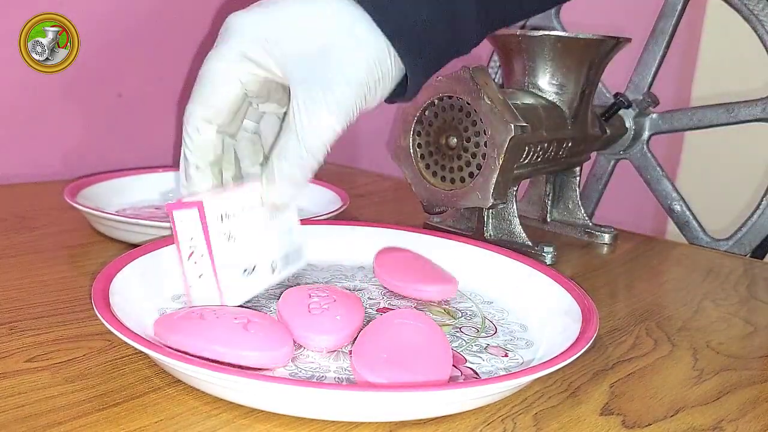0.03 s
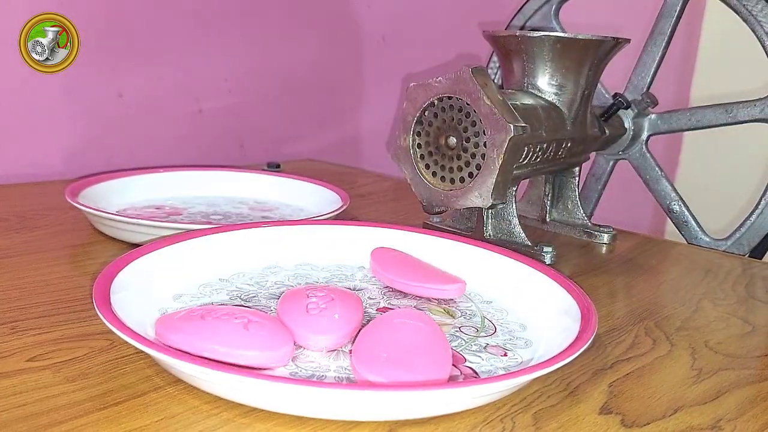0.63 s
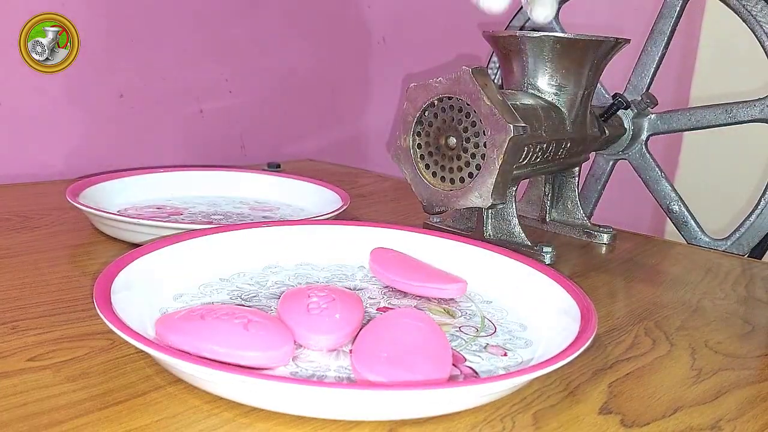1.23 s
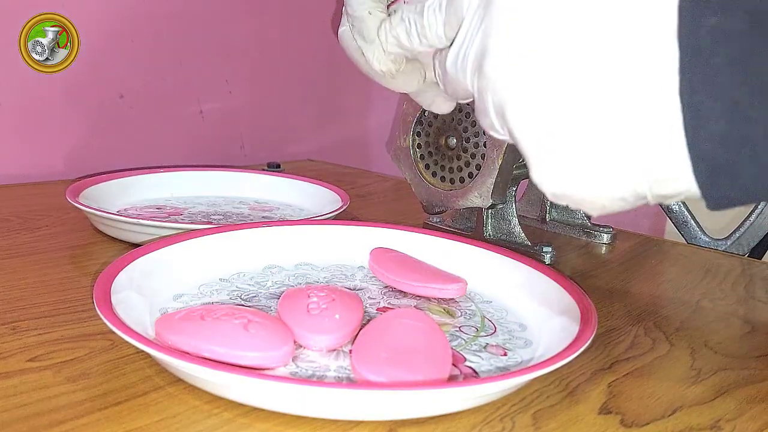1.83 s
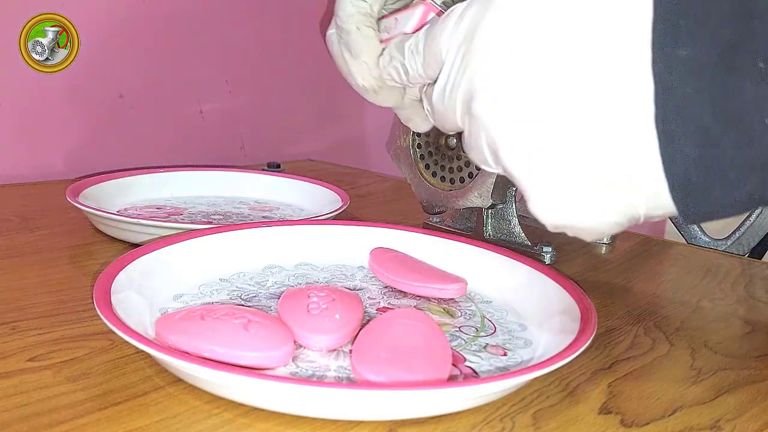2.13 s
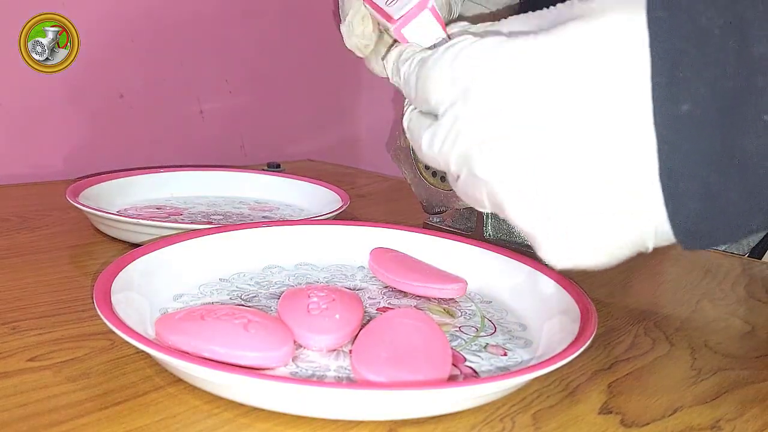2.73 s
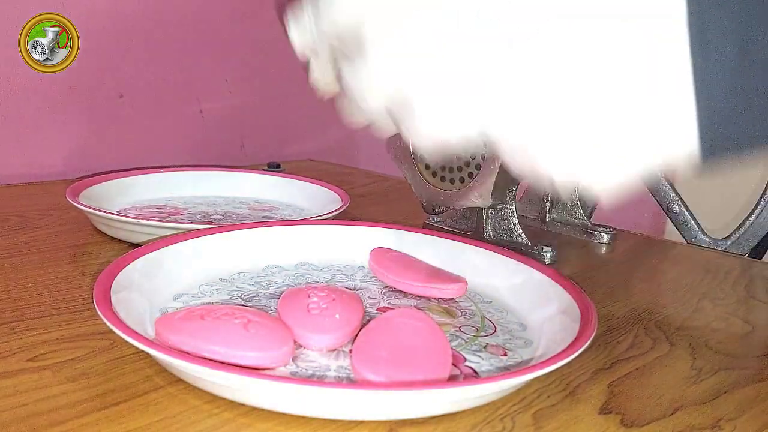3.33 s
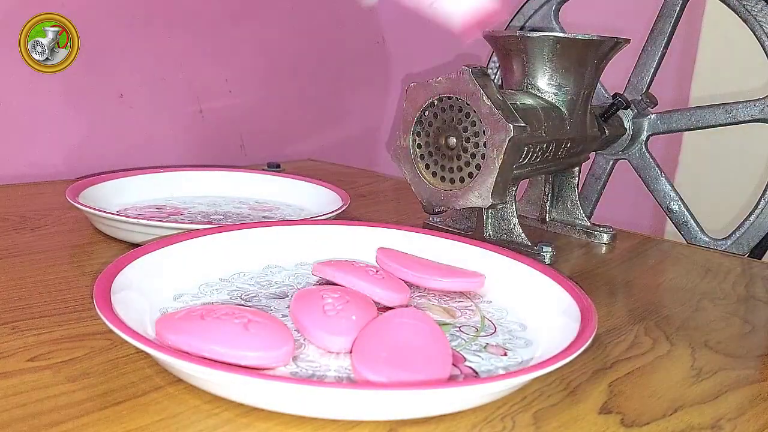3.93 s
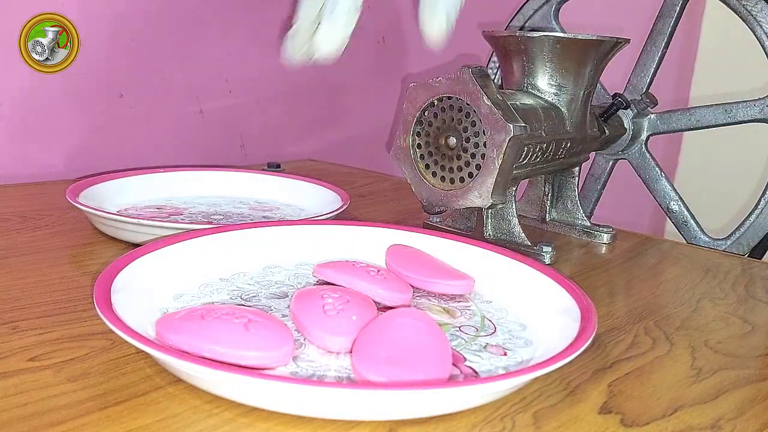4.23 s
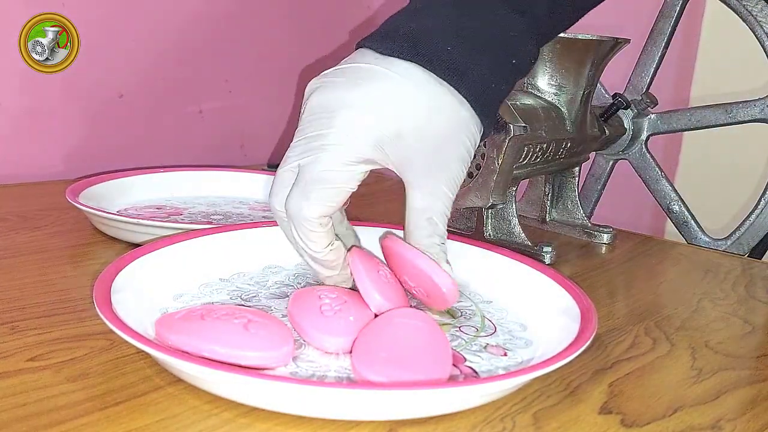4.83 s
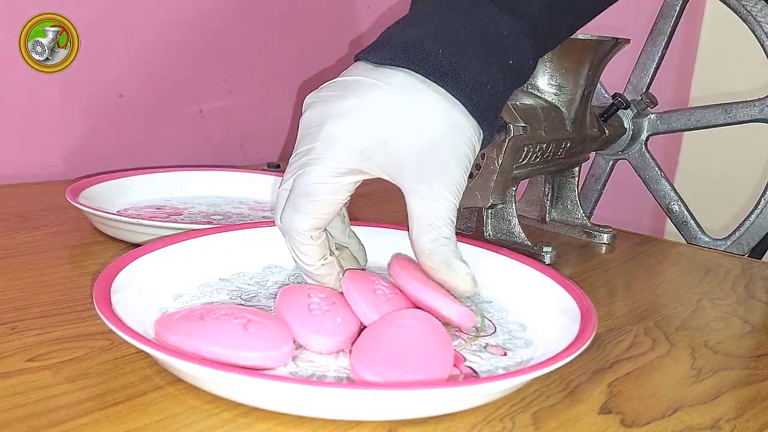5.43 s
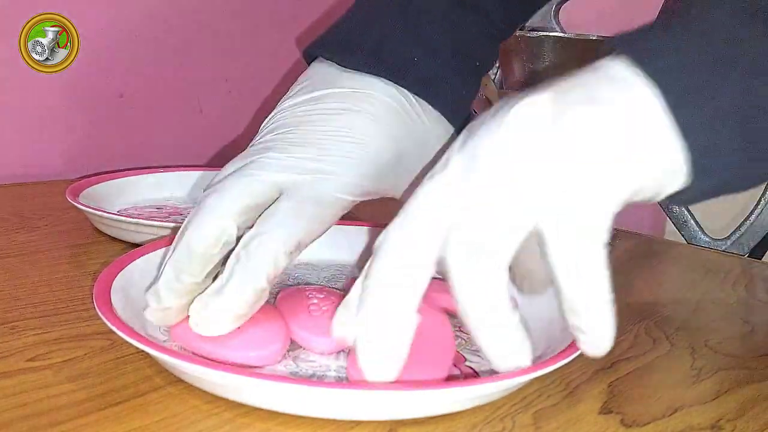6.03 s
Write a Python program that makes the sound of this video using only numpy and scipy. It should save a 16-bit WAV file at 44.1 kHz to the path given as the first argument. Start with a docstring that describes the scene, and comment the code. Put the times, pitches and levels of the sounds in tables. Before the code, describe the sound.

A card box is opened with small snaps, then a soap bar drops and clatters among others on a plate in a quiet room.

```python
"""Soap knocks softly on a plate and a bar rocks to rest as gloved hands lift a carton away.
Close by, just left of a pair of microphones, the card pops, the flap scrapes open and a bar slides out.
It clatters among the other bars on the plate, which rings and thumps the wooden table.
Fingers then nudge the bars, which knock and rock again; a small bare room answers it all."""
import sys
import numpy as np
from scipy import signal
from scipy.fft import rfft, irfft, next_fast_len
from scipy.io import wavfile
from scipy.ndimage import uniform_filter1d

SR = 44100
rng = np.random.default_rng(int(sys.argv[2]) if len(sys.argv) > 2 else 0)


def inscribe(sig):
    """Save sig as 16-bit PCM at rate SR to the path in sys.argv[1].

    A 1-D sig is mono; a 2-D sig holds one channel per row.
    Samples are clipped to [-1, 1] before scaling.
    """
    pcm = np.round(np.clip(np.atleast_2d(sig).T, -1, 1) * 32767)
    wavfile.write(sys.argv[1], SR, pcm.astype(np.int16))


N = 268569
T = np.arange(N) / SR
SHORT = 4096  # samples in one short blow


# Soap striking soap and plate, close to the microphones; the first few, up to 0.2 s, are the carton tapping #
# against the soap and plate. Each row: start in seconds, level in dB, # brightness in Hz, chatter in seconds,
# then the hollow note's pitch in Hz, t60 in seconds and share in dB.
SOAP_KNOCKS = [(0.043, -41, 1800, 0.016, 434, 0.05, 15), (0.048, -41.5, 1770, 0.0012, 1615, 0.02, 8.5),
               (0.061, -46.5, 2240, 0.0011, 1770, 0.016, 3), (0.087, -39, 1690, 0.0009, 1400, 0.009, 0),
               (0.140, -45.5, 955, 0.0038, 834, 0.058, 3), (0.176, -48.5, 1290, 0.01, 424, 0.024, 10.5),
               (0.255, -59, 1300, 0.0076, 935, 0.04, 3), (0.307, -55, 1300, 0.0066, 880, .03, 10),
               (0.367, -59, 1460, 0.0035, 1530, 0.019, 5), (0.498, -64.5, 1390, .006, 900, .02, 3),
               (0.609, -60, 1130, 0.0073, 870, 0.028, 2), (3.673, -16, 4500, 0.00074, 2232, 0.005, -0.5),
               (3.6753, -20, 8950, 0.0007, 1980, .012, -1.5), (3.689, -22.5, 890, 0.0045, 910, 0.017, 6.5),
               (3.703, -22, 1100, 0.0058, 664, 0.018, 7), (3.717, -25.5, 1010, 0.011, 520, .025, -0.5),
               (3.7304, -21, 9500, 0.0032, 990, 0.0077, -8), (3.7358, -18.5, 6250, 0.002, 4110, .008, -6.5),
               (3.742, -25.5, 1710, 0.013, 540, 0.015, -11), (3.753, -29.5, 1700, 0.0063, 1333, .015, -23),
               (3.764, -19.5, 3000, .005, 2288, 0.01, -7), (3.773, -21, 3930, 0.0048, 1930, 0.026, -6),
               (3.792, -33.5, 1295, 0.0062, 300, 0.079, -10), (3.813, -20, 2460, 0.017, 2030, 0.01, -18),
               (3.839, -27.5, 897, 0.0032, 535, .025, 5), (3.853, -28.5, 1400, .006, 681, 0.018, -11),
               (3.868, -23.5, 5020, 0.0058, 376.5, 0.013, 5),
               (3.8727, -20, 7840, 0.0026, 2993, 0.0097, -6.5), (3.881, -26.5, 5390, 0.0042, 1940, .015, 6),
               (3.899, -28, 1314, 0.0042, 479, 0.025, 1.5), (3.917, -36, 1800, .005, 326, 0.033, -3),
               (4.402, -50, 890, 0.0059, 500, 0.048, 0.5), (4.692, -48, 1115, 0.00036, 874, 0.048, 2),
               (4.725, -39.5, 2700, 0.0086, 904, 0.019, -7), (4.751, -48, 1300, 0.012, 1213, 0.032, 14),
               (4.809, -44.5, 1434, 0.004, 1593, 0.025, 2), (4.992, -60, 908, 0.011, 614, 0.033, -9),
               (5.073, -65.5, 1413, 0.0048, 1242, 0.016, 0), (5.136, -54.5, 1010, 0.009, 840, 0.048, 0),
               (5.267, -47.5, 3590, 0.0059, 857, 0.016, 2), (5.274, -46, 2770, 0.0041, 1318, 0.012, -2),
               (5.297, -46, 620, 0.0098, 610, .03, 7), (5.578, -54.5, 926, 0.0035, 844, 0.037, -5.5),
               (5.614, -57.5, 1500, 0.0052, 1300, .015, 4), (5.646, -44.5, 6570, 0.0027, 1400, 0.014, 9.5),
               (5.696, -47.5, 880, 0.004, 398, 0.037, 4), (5.7202, -41, 1900, 0.0013, 940, 0.015, 3.5),
               (6.076, -46, 1640, 0.011, 1330, 0.022, -9)]
# The broad crack of a waxy contact. Each row: frequency in Hz, level in dB.
WAX_CRACK = [(60, -16), (300, 20), (700, 5), (1200, -11), (2200, -4), (3500, -1), (5000, -2), (7500, -9.5),
             (11000, -12.5), (15000, -11.5)]
# A bar's short clack. Each row: pitch in Hz, level in dB, t60 in seconds.
BAR_MODES = [(560, -10.5, 0.0054), (956.6, -7.5, 0.007), (1354, 4, 0.0043), (1960, -1, 0.005),
             (2360, 4, 0.0013), (3056, -12, 0.008)]
# The ring of the loaded plate. Each row: pitch in Hz, level in dB, t60 in seconds.
PLATE_MODES = [(157, -3.5, .6), (255, -4, .2), (300, -1, .4), (364, -3, .35), (416, -6, .35),
               (495, -5, .38), (538, -4, .35), (571, -5, .36), (606, -6, .3), (652, -4, .3), (681, -4, .3),
               (830, -2, .2), (892, 0, .25), (1020, -2, .14), (1152, -2, .16), (1314, -2, .16),
               (1450, -3, .12), (1615, 0, .18), (1770, -2, .12), (1905, 0, .17), (1949, -1, .16),
               (2078, -1, .15), (2145, -1, .16), (2260, -2, .13), (2331, -3, .14), (2560, -5, .07),
               (2750, -6, .06), (3110, -9, .05)]


def soap(thin_share=0.61, spread_s=0.0035, plate_db=-6, plate_reach_hz=2700, spot_count=4):
    """Each knock cracks, clacks and rings the plate; one track for each spot on the plate."""
    spots = np.zeros((spot_count, N))
    click = crack(WAX_CRACK)
    bar = modes(BAR_MODES, SHORT)
    plate_hz = np.array(PLATE_MODES)[:, 0]
    spread = 1 - np.exp(-T[:SR // 2] / spread_s)  # bending waves need a moment to fill the plate
    for k, (s, db, bright_hz, chatter_s, note_hz, note_t60, note_db) in enumerate(SOAP_KNOCKS):
        spot = spots[k % spot_count]
        # hard blows land on a small edge, which radiates little bass
        edge = signal.butter(1, min(thin_share * bright_hz, SR / 4), "high", fs=SR)
        force = contact(bright_hz, chatter_s)
        clack = struck(signal.lfilter(*edge, force), click + ring(bar))
        add(spot, s, db, unit(clack + amp(note_db) * hollow(force, note_hz, note_t60)))
        reach_hz = min(bright_hz, plate_reach_hz)  # soft wax drives only the plate's lower modes
        drive = rng.choice([-1, 1], len(plate_hz)) / np.sqrt(1 + (plate_hz / reach_hz) ** 4)
        plate = ring(modes(PLATE_MODES, SR // 2, detune=0.013), drive)  # shifting bars change the load
        add(spot, s, db + plate_db, spread * plate)
    return spots


# The bar's full weight coming down. Each row: start in seconds, level in dB.
BAR_LANDINGS = [(3.677, -27), (3.734, -25), (3.875, -35)]
# The wooden table under the plate. Each row: pitch in Hz, level in dB, t60 in seconds.
TABLE_MODES = [(72.96, 2, 0.84), (104, 4.5, 0.15), (158.8, -15.5, 1), (240, -4.5, 0.035)]


def table_thumps(build_s=0.02):
    """The falling bar bends the table top, which carries the thud straight to the microphones."""
    out = np.zeros(N)
    build = 1 - np.exp(-T[:SR] / build_s)
    thud = unit(modes(TABLE_MODES, SR).sum(axis=0) * build)
    for s, db in BAR_LANDINGS:
        add(out, s, db, thud)
    return out


# Card snapping in the hands. Each row: start in seconds, level in dB, brightness in Hz,
# chatter in seconds, then the hollow note's pitch in Hz, t60 in seconds and share in dB.
CARD_SNAPS = [(0.049, -47, 10800, 0.0014, 4480, 0.0071, -15), (0.062, -54, 7000, 0.0024, 3270, .004, -6),
              (0.083, -57, 7500, .004, 4840, 0.0034, -6), (0.14, -55, 6000, 0.0028, 4480, .008, -9),
              (0.176, -55, 11500, 0.001, 3740, .008, -35), (1.405, -59.5, 2000, 0.0095, 880, .02, -5),
              (1.43, -59.5, 3000, 0.0067, 1500, 0.0062, -14), (1.629, -58, 9000, 0.002, 1120, 0.0092, 4),
              (1.6665, -47, 18300, 0.00063, 490, 0.018, 7), (1.682, -45, 3500, 0.0037, 1610, 0.005, 3),
              (1.70, -49.5, 1200, 0.0054, 435, .03, 9), (2.1744, -46.5, 19300, 0.0021, 880, 0.027, 1),
              (2.244, -56, 11900, 0.0035, 3330, .004, 1), (2.2495, -40.5, 18900, 0.0014, 7700, 0.0045, -19),
              (2.2483, -39.5, 7400, 0.0012, 1210, 0.012, -3), (2.2512, -39, 4530, 0.0018, 2460, 0.0029, 8),
              (2.2555, -42, 18800, 0.0027, 2970, 0.0042, -0.5),
              (2.934, -47, 14200, 0.015, 2420, 0.0057, -3.5),
              (3.0061, -38.5, 9000, 0.00063, 1100, 0.013, 5),
              (3.019, -41.5, 17000, 0.0054, 1050, 0.0091, -1.5),
              (3.0454, -42, 3186, 0.0022, 2380, 0.0084, 12),
              (3.054, -45.5, 3300, 0.0064, 1480, 0.028, -1.5), (3.172, -60, 11200, .005, 7060, .004, -11.5),
              (3.203, -54, 2372, 0.007, 1080, 0.0082, -1.5), (3.563, -58, 1325, 0.0026, 990, 0.024, -2),
              (3.597, -46, 1276, 0.0036, 1098, 0.022, 2), (4.160, -55.5, 11150, 0.0085, 4160, .004, -2)]
# The broad crack of creased card. Each row: frequency in Hz, level in dB.
CREASE_CRACK = [(100, -23.5), (400, 4.5), (1000, 10), (2500, 2.5), (4000, -4.5), (7000, -4.5),
                (15000, -12.5)]
# The hollow carton. Each row: pitch in Hz, level in dB, t60 in seconds.
CARTON_MODES = [(820, -7.5, 0.045), (1061, -2.5, 0.027), (1470, 0.5, 0.0074), (2044, -3, .009),
                (2900, -8.5, .005)]


def carton_snaps(carton_db=-2, thin_hz=1000, thin_at_bright_hz=8200):
    """Folds and tabs let go with a crack and a hollow pop; bright snaps from small edges are thin."""
    out = np.zeros(N)
    click = crack(CREASE_CRACK)
    for s, db, bright_hz, chatter_s, note_hz, note_t60, note_db in CARD_SNAPS:
        low_cut_hz = min(thin_hz * (bright_hz / thin_at_bright_hz) ** 2, SR / 4)
        edge = signal.butter(1, low_cut_hz, "high", fs=SR)
        force = contact(bright_hz, chatter_s)
        carton = modes(CARTON_MODES, SHORT, detune=0.081)  # the grip changes the carton's hollow
        snap = struck(signal.lfilter(*edge, force), click + amp(carton_db) * ring(carton))
        add(out, s, db, unit(snap + amp(note_db) * hollow(force, note_hz, note_t60)))
    return out


# Soap rasping inside the carton. Each row: frequency in Hz, level in dB.
SLIDE_SPECTRUM = [(150, -12.5), (550, -4), (750, -4), (1000, 1), (1400, -0.5), (1800, -6), (2600, -20.5),
                  (4000, -21), (6000, -19.5), (14000, -26.5)]


def bar_slide(start_s=3.555, exit_s=3.672, db=-38.5, release_s=0.0055):
    """The tipped bar speeds up evenly, and its rasp grows until it leaves the carton."""
    speed = np.clip((T - start_s) / (exit_s - start_s), 0, 1)
    inside = np.exp(-np.clip((T - exit_s) / release_s, 0, 20))
    return amp(db) * speed * inside * friction(SLIDE_SPECTRUM)


# Pulls on the flap. Each row: start in seconds, length in seconds, level in dB.
FLAP_PULLS = [(2.172, 0.058, -57), (2.898, 0.12, -52), (2.916, 0.019, -53), (2.998, 0.054, -45)]
# Card dragging on card. Each row: frequency in Hz, level in dB.
FLAP_SPECTRUM = [(180, -36), (300, -11), (404, -36), (453, -30), (600, -10), (652, -5.5), (1020, 3),
                 (1540, -0.5), (4420, -6.5), (5210, -12), (10300, -14.5), (15500, -15)]


def carton_flap(fibres_db=-3, catch_db=3.5, catches_per_s=130):
    """The flap drags out of its slot in small jerks while the card's fibres crackle."""
    scrape = friction(FLAP_SPECTRUM, grain_db=-0.5) + amp(fibres_db) * crackle()
    jerks = amp(catch_db * wander(catches_per_s))
    return strokes(FLAP_PULLS, attack_s=0.017, release_s=0.014) * jerks * scrape


# A rounded bar rocking on the plate. Each row: first swing in seconds, end of the swings in seconds,
# time between swings in seconds, level in dB.
ROCKING_SPELLS = [(0.078, .93, 0.1121, -47.5), (5.662, 6.0, 0.066, -51)]
# Its rolling rumble. Each row: frequency in Hz, level in dB.
RUMBLE_SPECTRUM = [(100, -10), (157, 3.5), (210, -11.5), (330, -8), (440, 9.5), (560, -14), (700, -35),
                   (1700, -26), (4000, -52)]
# Its rattle. Each row: frequency in Hz, level in dB.
RATTLE_SPECTRUM = [(500, 11.5), (850, -1.5), (1150, -9), (1600, -12), (2200, -11), (4000, -30), (8000, -23)]
ROCK_HZ, ROCK_BEND_HZ, ROCK_WIDTH_HZ = 366.6, 99, 59
ROCK_NOTE_DB, RUMBLE_DB, RATTLE_DB = 3, -1, -8


def rocking_bar(swing_s=0.017, uneven_s=0.0075, uneven_db=1.2, fade_db_per_s=13.5):
    """The bar rumbles and rattles in uneven, dying swings; its rough contact note rises in mid-swing."""
    swing, gain = np.zeros(N), np.zeros(N)
    for first_s, rest_s, period_s, db in ROCKING_SPELLS:
        for s, (late, strong) in zip(np.arange(first_s, rest_s, period_s), rng.standard_normal((16, 2))):
            from_middle = abs(T - s - uneven_s * late) / swing_s
            speed = np.exp(-.5 * np.minimum(from_middle, 10) ** 2)
            swing = np.maximum(swing, speed)
            gain += amp(db - fade_db_per_s * (s - first_s) + uneven_db * strong) * speed
    phase = 2 * np.pi * np.cumsum(ROCK_HZ + ROCK_BEND_HZ * swing) / SR
    note = (wander(ROCK_WIDTH_HZ) * np.sin(phase) + wander(ROCK_WIDTH_HZ) * np.cos(phase)) / np.sqrt(2)
    rattle = swing * friction(RATTLE_SPECTRUM, grain_db=6.5)
    rumble = friction(RUMBLE_SPECTRUM)
    return gain * (amp(ROCK_NOTE_DB) * note + amp(RUMBLE_DB) * rumble + amp(RATTLE_DB) * rattle)


# Fingers pushing a bar. Each row: start in seconds, length in seconds, level in dB.
SCUFF_PUSHES = [(-0.03, 0.037, -41.5), (.26, 0.34, -66.5), (1.39, 0.015, -68), (4.395, 0.023, -55),
                (4.71, 0.12, -49), (4.98, 0.094, -62.5), (5.1, 0.23, -66.5), (5.612, 0.12, -52)]
# Soap dragging on the plate. Each row: frequency in Hz, level in dB.
SCUFF_SPECTRUM = [(150, 5.5), (350, 4.5), (600, 8.5), (850, -1), (1400, -3.5), (2100, -10.5), (3000, -27),
                  (6000, -23), (12000, -35)]


def bar_scuffs():
    """A pushed bar scuffs over the plate in tiny slips."""
    return strokes(SCUFF_PUSHES, attack_s=0.0055, release_s=0.022) * friction(SCUFF_SPECTRUM, grain_db=3)


# Glove strokes. Each row: start in seconds, length in seconds, level in dB, extra treble in dB.
GLOVE_STROKES = [(-0.03, 0.13, -66, 0), (0.268, 0.32, -74.5, -11), (0.85, .12, -69.5, -8),
                 (1.005, 0.31, -75, 2), (1.3, 0.16, -72.5, -8), (1.694, 0.2, -70, -2),
                 (1.993, 0.031, -65, -10), (2.31, 0.15, -66, -2.5), (2.504, 0.085, -69.5, -13),
                 (2.728, 0.07, -85, 17), (3.11, 0.19, -66.5, -1), (3.353, 0.07, -70.5, 9),
                 (3.483, 0.054, -75.5, 4), (3.571, 0.61, -67.5, 2.5), (4.417, 0.057, -70.5, -0.5),
                 (4.605, 0.11, -68, 2), (4.731, 0.14, -72.5, -9), (5.0, 0.28, -78.5, 1.5),
                 (5.731, 0.18, -76.5, 8), (5.858, 0.33, -75.5, 3.5)]
# Rubber brushing, heard close up. Each row: frequency in Hz, level in dB.
GLOVE_SPECTRUM = [(700, -21), (1600, 4), (3000, -2.5), (4700, 0.5), (7000, -2.5), (11000, -5.5),
                  (15500, -11)]


def gloves(crackle_db=-4.5, treble_hz=7000):
    """Rubber sticks and lets go on card and soap with a fine crackle; light, quick touches hiss."""
    rub = friction(GLOVE_SPECTRUM, grain_db=0.5) + amp(crackle_db) * crackle()
    hiss = signal.sosfiltfilt(signal.butter(2, treble_hz, "high", fs=SR, output="sos"), rub)
    out = np.zeros(N)
    for s, length, db, treble_db in GLOVE_STROKES:
        touch = strokes([(s, length, db)], attack_s=0.04, release_s=0.055)
        out += touch * (rub + (amp(treble_db) - 1) * hiss)
    return out


# The fine crackle of card and rubber. Each row: frequency in Hz, level in dB.
CRACKLE_SPECTRUM = [(900, -9), (2500, 6), (6000, -1), (11000, 2), (15500, -0.5)]


def crackle(clicks_per_s=860):
    """Lone clicks at random moments, a few much louder than the rest."""
    chance, size = rng.random(N), rng.standard_normal(N)
    return colour((chance < clicks_per_s / SR) * size * np.sqrt(abs(size)), CRACKLE_SPECTRUM)


# Arm movements at the table. Each row: start in seconds, length in seconds, level in dB.
ARM_MOVES = [(1.0, 0.058, -56.5), (1.2, 0.24, -61.5), (1.48, 0.27, -60.5), (1.93, 0.42, -57),
             (2.4, 0.22, -65), (2.76, 0.37, -63), (5.7, 0.22, -69)]
# Rustling cloth. Each row: frequency in Hz, level in dB.
SLEEVE_SPECTRUM = [(60, -10), (130, -7.5), (260, 6), (350, -3), (500, -13), (900, -20), (1600, -16.5),
                   (4000, -34.5)]


def sleeves():
    """Cloth rustles softly as the arms move."""
    return strokes(ARM_MOVES, attack_s=0.17, release_s=0.17) * friction(SLEEVE_SPECTRUM)


# One brief low drone. Each row: start in seconds, length in seconds, level in dB.
DRONE_STROKES = [(2.42, 0.28, -57)]
# Its two bass peaks. Each row: frequency in Hz, level in dB.
DRONE_SPECTRUM = [(55, -18.5), (70, 3), (88, -51.5), (138, -11.5), (170, -66), (900, -56)]


def drone():
    """Low friction, as of a forearm rubbing on the table."""
    return strokes(DRONE_STROKES, attack_s=0.085, release_s=0.023) * friction(DRONE_SPECTRUM)


# The decay of the small bare room. Each row: frequency in Hz, t60 in seconds.
ROOM_DECAY = [(80, 0.58), (300, 0.97), (1000, 0.67), (2200, 0.56), (5000, 0.36), (14000, 0.25)]
# The strength of its tail. Each row: frequency in Hz, level in dB.
ROOM_SPECTRUM = [(100, 5), (500, -3), (2000, 3), (5000, 6.5), (14000, 4.5)]


def room(early_db=-3, early_s=0.0058, late_db=-3, onset_s=0.0012):
    """Quick reflections off plate, table and near wall, then a tail whose treble dies first."""
    t = T[:SR]
    early = unit(diffuse(SR) * np.exp(-t / early_s) * (t > .0005))
    spectrum = rfft(diffuse(SR))
    octave = np.log2(np.clip(np.arange(spectrum.shape[1]), 64, 16384))
    late = 0
    for k in range(6, 15):
        band = irfft(spectrum * np.maximum(1 - abs(octave - k), 0), SR)
        decay = np.exp(-np.log(1000) * t / at(ROOM_DECAY, 2. ** k))
        late = late + amp(at(ROOM_SPECTRUM, 2. ** k)) * band * decay
    return amp(early_db) * early + amp(late_db) * unit(late * (1 - np.exp(-t / onset_s)))


# The quiet room around the table. Each row: frequency in Hz, level in dB.
ROOM_TONE_SPECTRUM = [(25, -0.5), (60, 6), (150, -3.5), (300, -3.5), (500, -7), (800, -18), (1600, -17),
                      (2600, -31), (5000, -31.5), (10000, -32.5), (15500, -48)]


def room_tone(db=-65):
    """Faint, steady, bass-heavy noise reaches the microphones from all sides."""
    return amp(db) * np.array([colour(side, ROOM_TONE_SPECTRUM) for side in diffuse(N)])


# The room's width at the microphones. Each row: frequency in Hz, side over mid in dB.
STEREO_WIDTH = [(60, -3.5), (250, -11), (600, -2), (1200, 0)]


def diffuse(count):
    """Noise from all sides: partly alike at both microphones in the bass, unrelated in the treble."""
    size = next_fast_len(count)
    mid, side = rfft(rng.standard_normal((2, size)))
    width = amp(at(STEREO_WIDTH, np.arange(len(mid)) * SR / size))
    pair = np.array([mid + width * side, mid - width * side]) / np.sqrt(1 + width ** 2)
    return irfft(pair, size)[:, :count]


# The balance of the microphone pair. Each row: frequency in Hz, left over right in dB.
MICROPHONE_BALANCE = [(60, 7.5), (200, 5), (550, 0.7), (1200, 0.2), (2600, 2.5), (5000, 0.6), (10000, 1),
                      (14000, -3)]


def microphones(sound):
    """The two microphones differ a little in colour."""
    tilt = at(MICROPHONE_BALANCE, np.arange(N + 1) * SR / (2 * N))
    return irfft(rfft(sound, 2 * N) * amp([tilt / 2, -tilt / 2]))[:, :N]


def contact(bright_hz, chatter_s, push_s=0.002, tick_db=-25):
    """A push, then tiny re-contacts; soft contacts carry less treble, though some always ticks through."""
    slips = rng.standard_normal(SHORT)
    force = unit(slips * np.sqrt(abs(slips)) * np.exp(-T[:SHORT] / chatter_s)) * chatter_s / push_s
    force[0] += 1
    soft = signal.lfilter(*signal.butter(2, min(bright_hz, .45 * SR), fs=SR), force)
    return soft + amp(tick_db) * force


def crack(points):
    """The sharpest causal click that has this (Hz, dB) spectrum."""
    hz = np.arange(SHORT // 2 + 1) * SR / SHORT
    cepstrum = irfft(np.log(amp(at(points, hz))))
    cepstrum[1:SHORT // 2] *= 2  # fold to minimum phase
    cepstrum[SHORT // 2 + 1:] = 0
    return unit(irfft(np.exp(rfft(cepstrum))))


def modes(table, count, detune=0):
    """One decaying sine for each (Hz, dB, t60) row; detune scatters the pitches by a random share."""
    hz, db, t60 = np.transpose(table)[:, :, None]
    hz = hz * (1 + detune * rng.standard_normal(hz.shape))
    return amp(db) * np.exp(-np.log(1000) * T[:count] / t60) * np.sin(2 * np.pi * hz * T[:count])


def ring(waves, drive=1):
    """Sum of modes; each striking point weights them a little differently."""
    return unit((drive * amp(2 * rng.standard_normal(len(waves)))) @ waves)


def struck(force, body):
    """A small body's answer to a force, with an energy of one."""
    return unit(irfft(rfft(force) * rfft(body)))


def hollow(force, hz, t60):
    """The short note of the spot that is hit, set by how it is held or where it rests."""
    return struck(force, modes([(hz, 0, t60)], SHORT)[0])


def friction(points, grain_db=4):
    """Dense tiny slips of uneven size, heard through a body's colour."""
    grains = np.minimum(rng.standard_normal(N // 32 + 1), 2)
    sizes = amp(grain_db * np.repeat(grains, 32)[:N])
    return colour(rng.standard_normal(N) * sizes, points)


def strokes(rows, attack_s, release_s):
    """Gain of (start, length, dB) strokes: each swells, holds and dies away."""
    gain = np.zeros(N)
    for s, length, db in rows:
        swell = np.clip((T - s) / attack_s, 0, 1)
        release = np.exp(-np.clip((T - s - length) / release_s, 0, 20))
        gain += amp(db) * swell * release
    return gain


def wander(rate):
    """A smooth random curve with about rate turns a second and a spread of one."""
    size = int(SR / rate)
    steps = np.repeat(rng.standard_normal(1024), size)[:N]
    walk = uniform_filter1d(np.resize(steps, N), size)
    return walk / walk.std()


def colour(x, points):
    """Give a signal a (Hz, dB) spectrum that falls away below its first point; rms one."""
    size = next_fast_len(len(x))
    hz = np.arange(size // 2 + 1) * SR / size
    gain = amp(at(points, hz)) * np.minimum(hz / points[0][0], 1) ** 2
    y = irfft(rfft(x, size) * gain, size)[:len(x)]
    return y / y.std()


def add(track, s, db, sound):
    """Mix in a blow; for an energy of one, db is its level over 10 ms."""
    start = max(int(s * SR), 0)
    part = sound[:N - start]
    track[start:start + len(part)] += amp(db) * np.sqrt(SR / 100) * part


def amp(db):
    """Decibels to gain."""
    return 10 ** (np.asarray(db) / 20)


def at(points, hz):
    """Read a table on a log-frequency axis."""
    f, value = np.transpose(points)
    return np.interp(np.log(hz + 1), np.log(f), value)


def unit(x):
    """Scale to an energy of one."""
    return x / np.sqrt(np.sum(x ** 2, axis=-1, keepdims=True) + 1e-20)


def scene(direct_db=-3, right_lag_s=0.00007, grip_db=2, grips_per_s=60):
    """The hands work just left of the microphones; each spot has its own reflections."""
    knocks, snaps = soap(), carton_snaps()
    grip = amp(grip_db * (wander(grips_per_s) - .5))  # fingers catch and slip
    handling = bar_slide() + carton_flap() + grip * (bar_scuffs() + gloves()) + sleeves() + drone()
    spots = np.vstack([knocks, snaps, handling, rocking_bar()])
    left = spots.sum(axis=0)
    right = np.pad(left, (round(right_lag_s * SR), 0))[:N]
    direct = amp(direct_db) * np.array([left, right])
    reflected = sum(signal.fftconvolve(spot[None], room(), axes=1)[:, :N] for spot in spots)
    return microphones(direct + reflected + table_thumps() + room_tone())


def record(dry, low_cut_hz=52, ceiling=0.85, top_hz=15900):
    """The phone cuts the deep bass, rounds the loudest peak and cuts the top of the treble."""
    thin = signal.sosfilt(signal.butter(2, low_cut_hz, "high", fs=SR, output="sos"), dry)
    rounded = ceiling * np.tanh(thin / ceiling)
    return signal.sosfilt(signal.ellip(10, .2, 70, top_hz, fs=SR, output="sos"), rounded)


dry = scene()
out = record(dry)
inscribe(out)
```